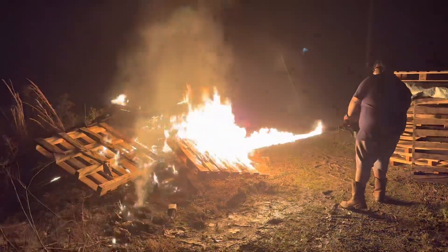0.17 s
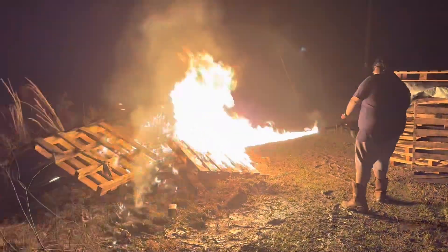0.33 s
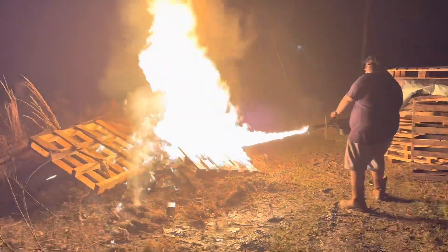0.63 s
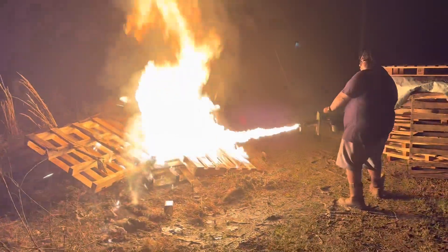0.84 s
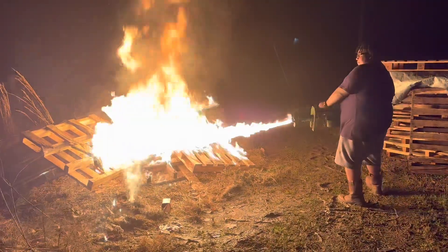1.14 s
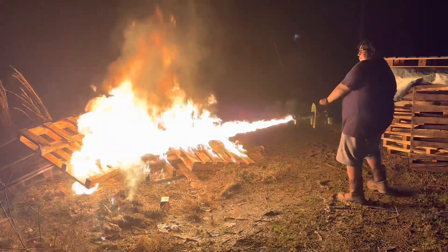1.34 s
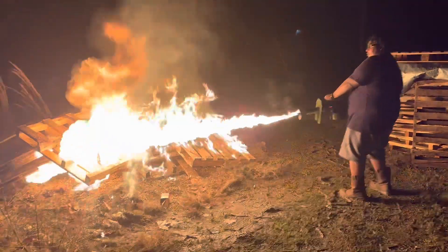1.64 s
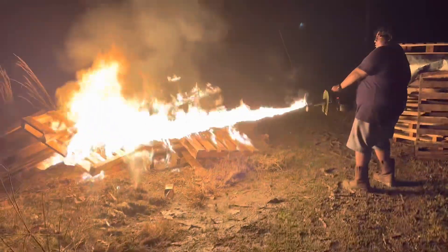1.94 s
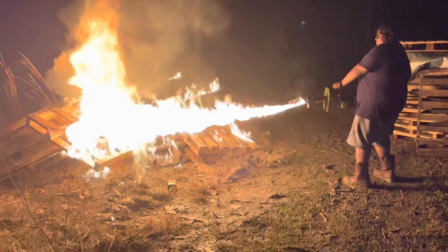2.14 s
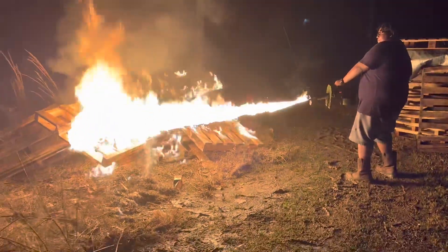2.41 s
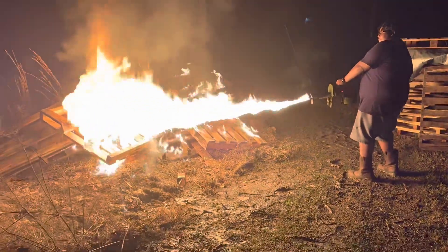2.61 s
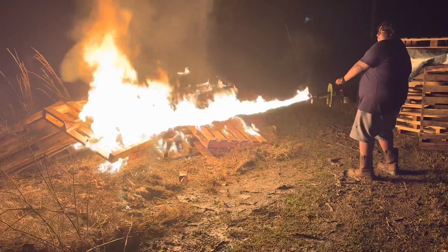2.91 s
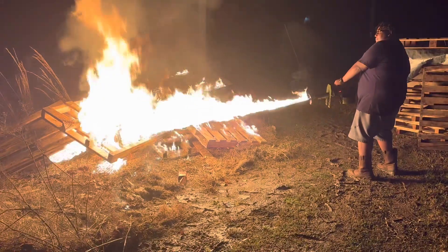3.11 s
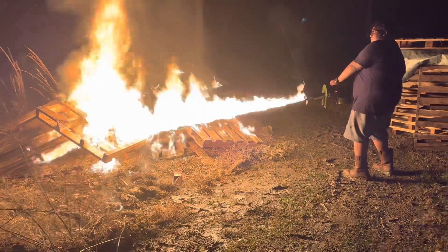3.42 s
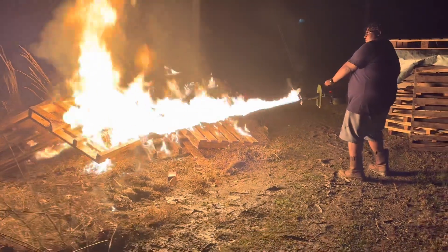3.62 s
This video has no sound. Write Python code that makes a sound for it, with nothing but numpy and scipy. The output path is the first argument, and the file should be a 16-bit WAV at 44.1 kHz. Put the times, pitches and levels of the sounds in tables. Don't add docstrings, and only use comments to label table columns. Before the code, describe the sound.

A gas torch roars into burning pallets throughout about 3.8 seconds: deep, gusting fireball rumble under a brighter jet rush, swelling from 0.6 seconds. Thin, bright sap crackles cluster until 0.9, with a short sputtering steam hiss near 0.82; another burst comes around 1.9, then sparser ticks and left-leaning ember snaps. A loud, short woody pop cracks right at 3.3, with more ticks at 3.47. Open yard, stereo phone a few metres away.

```python
import sys
import numpy as np
from scipy import signal
from scipy.fft import rfft, irfft
from scipy.io import wavfile
from scipy.ndimage import uniform_filter1d

SR = 44100
rng = np.random.default_rng(int(sys.argv[2]) if len(sys.argv) > 2 else 0)


def master_out(mix):
    frames = np.transpose(np.atleast_2d(mix))
    ceiling = np.clip(frames, -1, 1)
    pcm = np.round(ceiling * 32767).astype(np.int16)
    wavfile.write(sys.argv[1], SR, pcm)


def gain_from_decibels(decibels):
    exponent = np.asarray(decibels, float) / 20
    return 10 ** exponent


N = 165816
T = np.arange(N) / SR
F = np.fft.rfftfreq(N, 1 / SR) + 1e-3

# [t/s, fireball level/dB, jet level/dB]
BURN = [(0, -32.5, -34), (.08, -34, -36.5), (.2, -32, -35.5), (.4, -32, -35), (.65, -26, -33),
        (.8, -26, -33), (.95, -25.5, -33), (1.08, -26, -33), (1.25, -28, -34.5), (1.5, -27, -34),
        (1.8, -29.5, -34), (2.02, -27, -33.5), (2.3, -29, -33.5), (2.8, -27.5, -34.5), (3.2, -27, -34),
        (3.6, -25, -33.5), (3.76, -25.5, -35)]
# [t/s, centre f/Hz, extra level/dB, length/s]
GAS_POCKETS = [(0.047, 700, -9, 0.047), (0.227, 514, -10.5, .12), (0.318, 1100, 9, 0.047),
               (0.397, 300, 4.5, 0.21), (0.445, 700, 4.5, 0.01), (0.615, 1100, 4, 0.027),
               (0.96, 90, 7, .06), (1.28, 150, -3.5, 0.093), (1.557, 1000, -6.5, 0.039),
               (1.72, 650, 2.5, 0.06), (2.045, 150, 6, 0.047), (2.276, 60, 0, 0.078), (2.7, 90, -4, .1),
               (3.008, 90, -5, 0.096), (3.213, 100, 8, 0.043), (3.41, 150, 0.5, .08), (3.62, 60, 2, .05),
               (3.72, 90, -12, 0.057), (.1, 4530, -5, 0.14), (0.098, 3000, 0, 0.09), (1.2, 150, -1.5, .07),
               (2.2, 278, -5, .08), (1.107, 5800, 3.5, .01), (1.56, 3000, 4, .01), (0.044, 187, -6, 0.032),
               (0.504, 61.3, 6, 0.036), (0.754, 80, -6, 0.035), (0.874, 80, 3, .05), (1.06, 196, -9, 0.065),
               (1.957, 150, 0.5, 0.071), (2.398, 203, 6, .04), (2.603, 100, -5, 0.066),
               (2.85, 129, 6, 0.075), (3.553, 150, -0.5, 0.068), (2.6, 1100, 7.5, 0.074)]
# [t/s, extra level/dB per octave above its centre]
JET_BRIGHTNESS = [(0, -2.5), (.14, 0.5), (.3, 1.5), (.6, 0.34), (1.0, 0.1), (1.5, -0.37), (2.2, -0.5),
                  (3.0, -0.37), (3.76, -0.45)]
# [f/Hz, level/dB per Hz]
FIREBALL_COLOUR = [(25, -42), (50, -1), (95, 0), (160, -3), (250, -9.5), (400, -24.5), (800, -40)]
# [f/Hz, level/dB per Hz]
JET_COLOUR = [(150, -3.5), (400, -3), (800, 0), (1200, -5), (1700, -10), (2700, -13), (4300, -20.5),
              (8000, -21)]
# [f/Hz, share, clipped to 0-1]
COMMON_SHARE = [(60, .999), (110, .996), (200, .97), (300, .9),
                (480, 0.81), (800, 1.45), (1350, 0.76), (2000, 1.02), (4300, 0.37), (8000, 1.15)]
# [f/Hz, lead/rad]
FLAME_LEAD = [(90, 0.19), (430, -0.045), (800, -0.54), (1500, -1.65), (2100, -0.21), (3000, -1.69),
              (5000, 0.84), (7400, -1.52)]
# [f/Hz, level/dB]
PORT_TILT = [(60, -.1), (200, -.3),
             (600, 0.6), (950, 4.4), (1300, 1.5), (1640, 0), (2500, 0.2), (4500, 4), (9000, 1.1)]

# [t/s, level/dB]
SIZZLE = [(0, -51.5), (.18, -38.5), (.25, -47), (.38, -40), (.62, -41.5), (.74, -47), (.86, -43),
          (1.0, -43.5), (1.1, -47), (1.28, -49), (1.5, -44), (1.8, -44.5), (1.91, -38.5), (2.03, -47),
          (2.35, -48.5), (2.43, -44), (3.3, -43.5), (3.7, -43.5)]
# [t/s, peak level/dB]
LOUD_TICKS = [(0.0313, -33), (0.0533, -42), (0.06, -36), (0.0687, -22), (0.1645, -24), (0.1704, -21),
              (0.1764, -30), (0.187, -20), (0.1934, -26), (0.2628, -23), (0.2684, -25), (0.3356, -27),
              (0.3436, -21), (0.3616, -17), (0.3814, -21), (0.3914, -17), (0.605, -29), (0.6184, -19),
              (0.6516, -17), (0.6838, -26), (0.6884, -23.5), (0.7058, -19), (0.7138, -18), (0.7372, -17),
              (0.7707, -16.5), (0.784, -22), (.8175, -18), (.823, -25), (.831, -33), (0.8485, -14),
              (0.8544, -21), (0.8614, -24),
              (1.004, -22), (1.1303, -26), (1.2261, -30), (1.5075, -25.5), (1.5519, -19), (1.6177, -26),
              (1.689, -30), (1.699, -19), (1.8711, -21), (1.8764, -26), (1.8834, -26), (1.8914, -21),
              (1.8986, -18), (1.9044, -25), (1.9144, -25), (1.9254, -18), (2.0862, -22), (2.1158, -18),
              (2.1254, -28.5), (2.2518, -30), (2.2609, -26), (2.8858, -23.5), (3.1028, -28), (3.2734, -23),
              (3.468, -19), (3.4734, -17), (3.4784, -19), (3.4844, -24)]
# [f/Hz, level/dB per Hz]
SAP_COLOUR = [(3000, -12), (5000, -15.5), (8500, -5.5), (10500, 2.5), (13000, -0.5), (15800, 0),
              (16300, -20), (17000, -36)]
# [f/Hz, lead/half turns]
SAP_LEAD = [(5500, -1.9), (7400, -.8), (8500, .03), (10400, .92), (12000, 1.1), (13800, 1.93),
            (15000, 2.08), (15900, 2.4)]

# [t/s, peak level/dB]
SNAPS = [(.0313, -30), (.06, -34), (.1645, -24), (.2618, -32), (.2684, -27), (.3621, -31), (.6838, -29),
         (.7063, -24), (.7143, -30), (.7362, -33), (.7766, -23), (.8485, -30), (1.1303, -31), (1.2261, -30),
         (2.0867, -28), (2.1156, -30), (2.1789, -20.5), (2.2518, -28), (2.3595, -22), (3.468, -24)]
# [f/Hz, level/dB per Hz]
SNAP_COLOUR = [(3000, -22), (6000, -9), (8000, -4), (11000, 0), (14000, -1), (15800, -2), (16100, -22),
               (17000, -45)]
# [f/Hz, left level/dB, right level/dB, t60/s, delay/s]
BOARD_MODES = [
    (316, -1.5, -0.5, 0.013, 0.0037),
    (544, -1, 4.5, 0.0073, 0.00182),
    (1000, -6, -12, 0.0087, 0.00088),
    (1560, -9, 2, 0.0093, 0.00043),
    (2200, -1.5, -5, 0.0053, 0.000707),
    (2560, -11, -12.5, 0.0058, 0.000696),
    (3700, -18, -24, 0.0015, 0.0007),
    (4900, -15, -25, 0.005, .0007),
    (6740, -11, -32, 0.0027, .0007),
]
# [t/s, level/dB]
STEAM_SPURTS = [
    (.815, -1),
    (.822, 2),
    (.836, -4),
    (.852, -4),
]
# [f/Hz, level/dB per Hz]
STEAM_COLOUR = [(2500, -22), (4000, -12), (4600, 0), (5700, -5), (6700, 0), (8000, -10), (11000, -16),
                (16000, -27)]

TREBLE_TOP_HZ = 15800
TICK_DELAY_S = .0015


def over_hz(table):
    table = np.array(table)
    return np.interp(np.log(F), np.log(table[:, 0]), table[:, 1])


def over_s(table, column=1):
    table = np.array(table)
    return np.interp(T, table[:, 0], table[:, column])


def unit(x):
    return x / np.sqrt(np.mean(x ** 2))


def shape(x, gain):
    return irfft(rfft(x) * gain, N)


def walk(rate):
    hold = int(SR / rate)
    steps = np.repeat(rng.standard_normal(N // hold + 1), hold)
    return unit(uniform_filter1d(uniform_filter1d(steps, hold), hold)[:N])


def gas_pockets(octave):
    extra = 0
    for s, hz, db, length in GAS_POCKETS:
        pitch_distance = (octave - np.log2(hz)) / 0.41
        extra = extra + db * np.exp(-pitch_distance ** 2 - ((T - s) / length) ** 2)
    return extra


def air_at_ports(colour):
    share = np.clip(over_hz(np.array(COMMON_SHARE)), 0, 1)
    turn = np.exp(1j * over_hz(FLAME_LEAD) * np.array([[0], [1]]))
    side = gain_from_decibels(over_hz(np.array(PORT_TILT)) * np.array([[.5], [-.5]]))
    noise = rfft(rng.standard_normal((3, N)))
    air = np.sqrt(share) * noise[0] * turn + np.sqrt(1 - share) * noise[1:]
    return air * side * gain_from_decibels(over_hz(colour)) / (1 + (F / 9300) ** 20)


def flame(colour, lo_hz, hi_hz, flap_db, flap_rate, own_db, tilt_db=0):
    flap, air = walk(flap_rate), air_at_ports(colour)
    out = 0
    for octave in np.arange(np.log2(lo_hz), np.log2(hi_hz)):
        band = np.cos(np.pi / 2 * np.clip(np.log2(F) - octave, -1, 1)) ** 2
        flicker = flap_db * flap + own_db * walk(flap_rate * 2)
        brightness = tilt_db * np.clip(octave - np.log2(890), -1.5, 2.5)
        out = out + irfft(air * band, N) * gain_from_decibels(flicker + gas_pockets(octave) + brightness)
    return unit(out)


def fireball():
    rumble = flame(FIREBALL_COLOUR, 18.0, 1200, flap_db=0.86, flap_rate=18, own_db=0.14)
    return rumble * gain_from_decibels(over_s(BURN, column=1))


def torch_jet():
    roar = flame(JET_COLOUR, 99, 12000, flap_db=-0.38, flap_rate=14, own_db=0.79,
                 tilt_db=over_s(JET_BRIGHTNESS))
    return roar * gain_from_decibels(over_s(BURN, column=2) + 2.0)


def small_ticks():
    rate, spread_db, ceiling = 330, 6.5, .08
    chance = rng.random((int(rate * 5), 3))
    at = (np.cumsum(0.33 + 1.4 * chance[:, 0]) / rate * SR).astype(int)
    strength = gain_from_decibels(-spread_db * np.log(chance[:, 1] + ceiling)) * np.sign(chance[:, 2] - .5)
    ticks = np.zeros(N)
    ticks[at[at < N]] = strength[at < N]
    return ticks


def clicks(events, colour, extra_db):
    out = np.zeros(N)
    for s, db in events:
        out[int((s + TICK_DELAY_S) * SR)] = gain_from_decibels(db + extra_db) / np.mean(colour)
    return out


def ground_echo(delay_s, db):
    return 1 + gain_from_decibels(db) * np.exp(-2j * np.pi * F * delay_s)


def crackle():
    colour, top = gain_from_decibels(over_hz(SAP_COLOUR)), 1 / (1 + (F / TREBLE_TOP_HZ) ** 200)
    bounce = colour * ground_echo(.0015, -8)
    fizz = gain_from_decibels(2) * rng.standard_normal(N)
    bed = unit(shape(unit(small_ticks()) + fizz, bounce * top))
    loud = clicks(np.array(LOUD_TICKS), colour, 5)
    fade = np.exp(-2 / (.007 * SR))
    tail = np.sqrt(signal.lfilter([1 - fade], [1, -fade], loud ** 2))
    scatter = gain_from_decibels(-2.5) * tail * rng.standard_normal(N)
    level = gain_from_decibels(over_s(SIZZLE) + 4.5 + 0.55 * walk(29.6))
    left = bed * level + shape(loud, bounce * top) + shape(scatter, colour * top)
    lead = np.exp(1j * np.pi * over_hz(SAP_LEAD))
    right = shape(left, lead) + .09 * walk(27) * shape(left, 1j * lead)
    apart = unit(shape(rng.standard_normal((2, N)), colour * top))
    return np.array([left, right]) + gain_from_decibels(-16) * level * apart


def snaps():
    colour = gain_from_decibels(over_hz(SNAP_COLOUR))
    click = shape(clicks(SNAPS, colour, 6), colour * ground_echo(.0016, -3))
    return click * np.array([[1], [gain_from_decibels(-6)]])


def pop():
    pop_s, rise_s = 3.2885, 0.00064
    out = 0
    for hz, left_db, right_db, t60, delay in BOARD_MODES:
        left_lag = .0002 + 0.19 / hz
        age = np.maximum(T - pop_s - delay - np.array([[left_lag], [0]]), 0)
        ring = np.sin(2 * np.pi * hz * age) * gain_from_decibels(-60 * age / t60) * (1 - np.exp(-age / rise_s))
        out = out + ring * np.array([[gain_from_decibels(left_db)], [gain_from_decibels(right_db)]])
    age = np.maximum(T - pop_s, 0)
    dull = 1 / (1 + (F / 900) ** 4) / (1 + (200 / F) ** 2)
    scatter = unit(shape(rng.standard_normal((2, N)), dull))
    return out + gain_from_decibels(-29.5) * (age > 0) * np.exp(-age / 0.1) * scatter


def steam():
    rise_s, fall_s = .0015, .009
    puff = 0
    for s, db in STEAM_SPURTS:
        age = np.maximum(T - s, 0)
        puff = puff + gain_from_decibels(db) * (1 - np.exp(-age / rise_s)) ** 2 * np.exp(-age / fall_s)
    puff = puff * gain_from_decibels(1.2 * walk(180))
    hiss = unit(shape(rng.standard_normal((3, N)), gain_from_decibels(over_hz(STEAM_COLOUR)) * (F < TREBLE_TOP_HZ)))
    return gain_from_decibels(-28) * puff * (hiss[0] + .4 * hiss[1:])


def scene():
    return fireball() + torch_jet() + crackle() + snaps() + pop() + steam()


def band_limit(x):
    return signal.sosfilt(signal.butter(12, 16820, fs=SR, output="sos"), x)


def record(dry):
    return band_limit(dry)


dry = scene()
out = record(dry)
master_out(out)
```